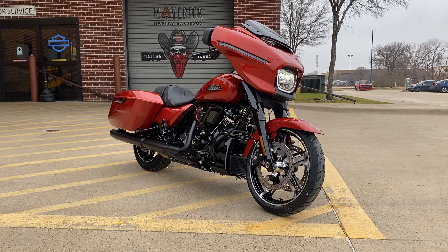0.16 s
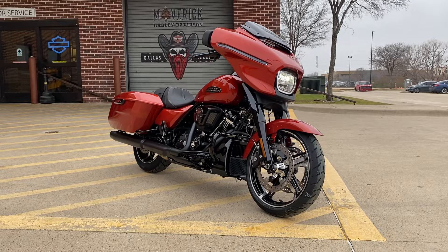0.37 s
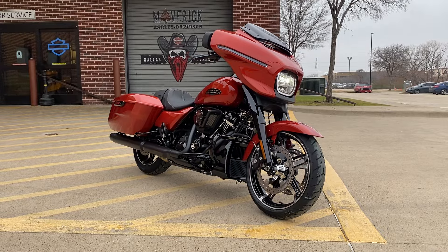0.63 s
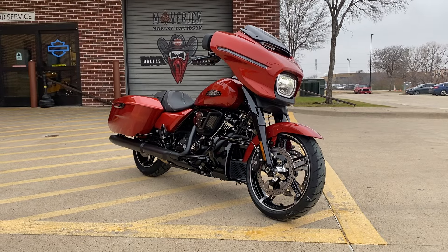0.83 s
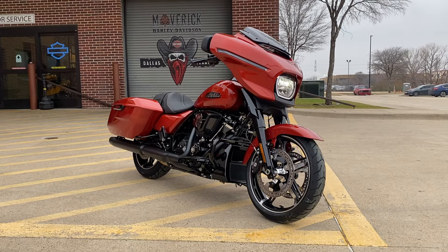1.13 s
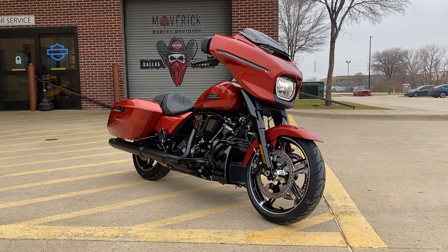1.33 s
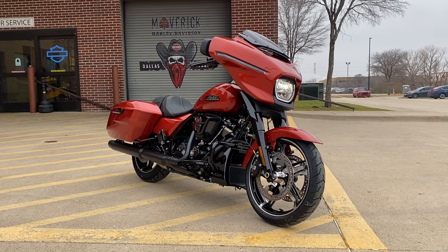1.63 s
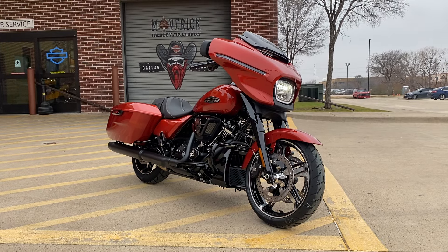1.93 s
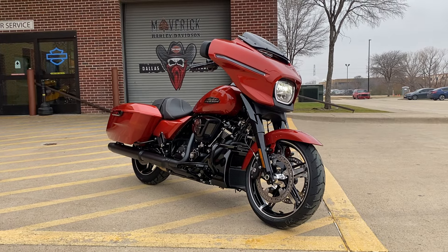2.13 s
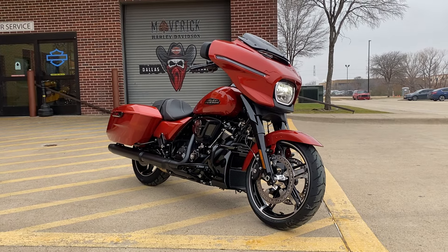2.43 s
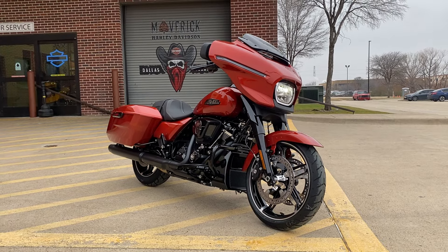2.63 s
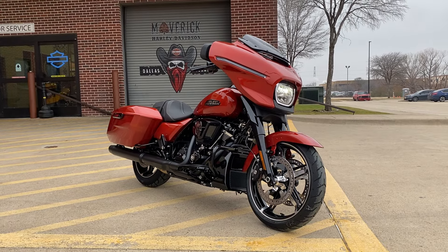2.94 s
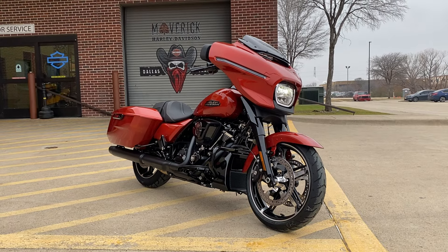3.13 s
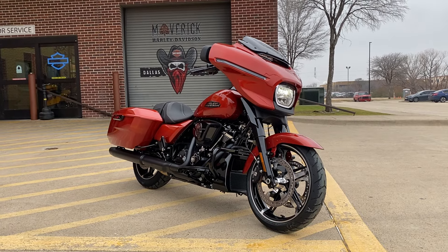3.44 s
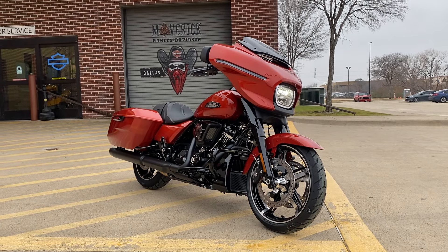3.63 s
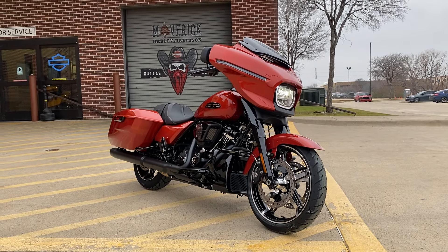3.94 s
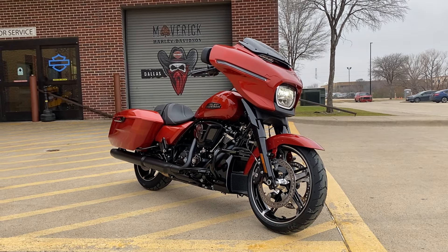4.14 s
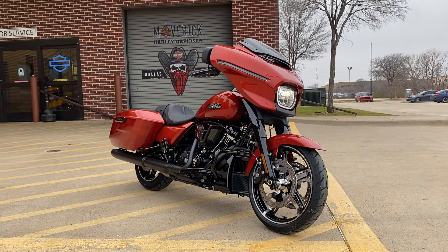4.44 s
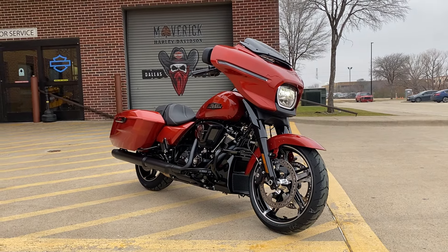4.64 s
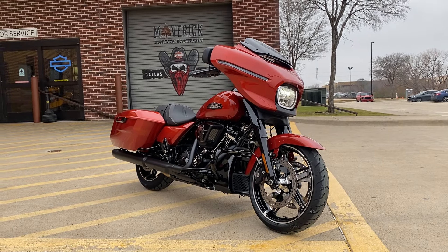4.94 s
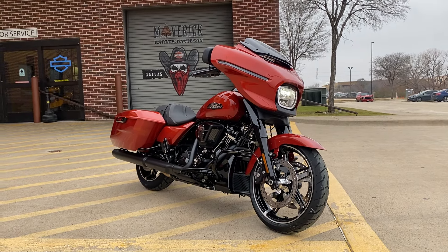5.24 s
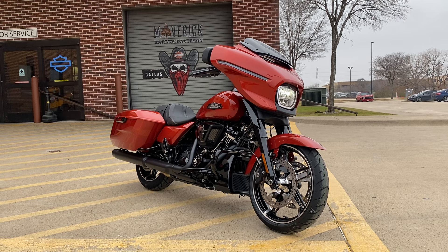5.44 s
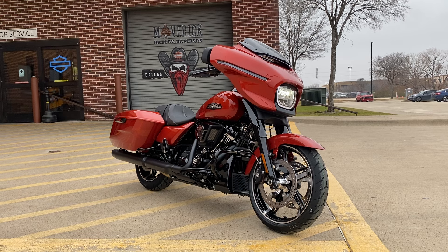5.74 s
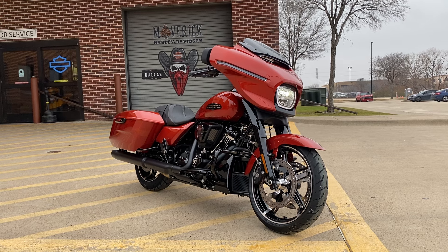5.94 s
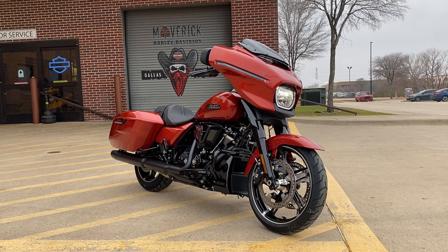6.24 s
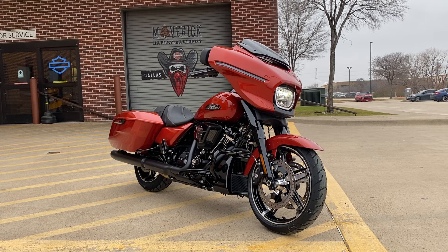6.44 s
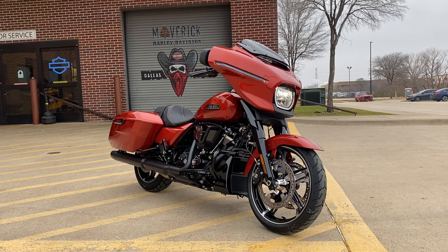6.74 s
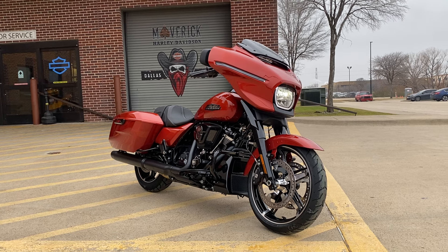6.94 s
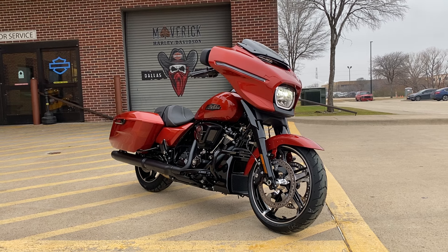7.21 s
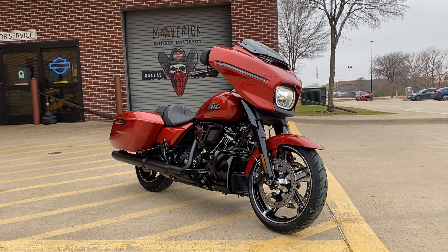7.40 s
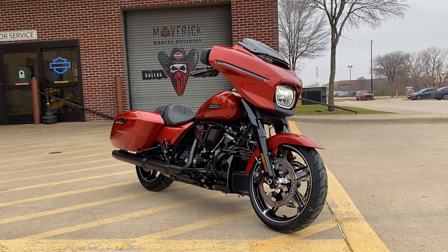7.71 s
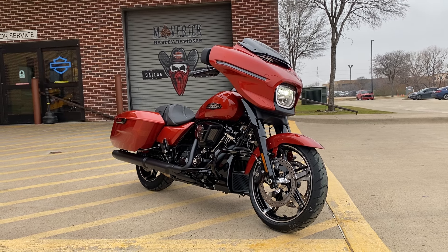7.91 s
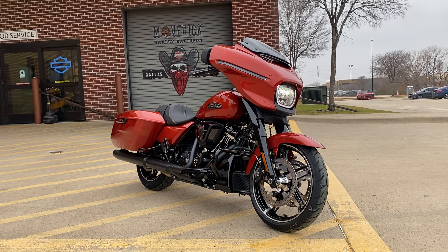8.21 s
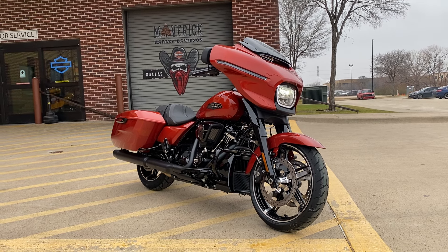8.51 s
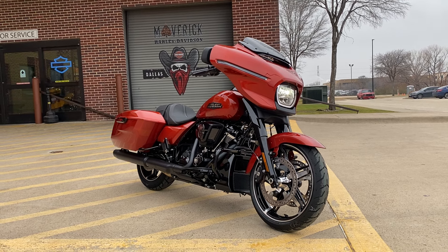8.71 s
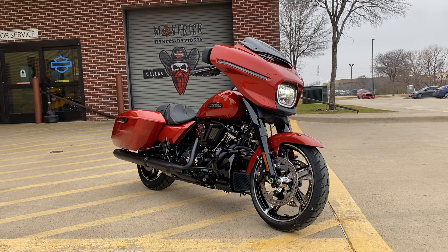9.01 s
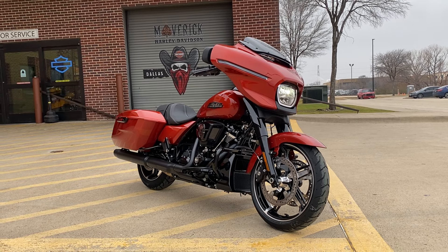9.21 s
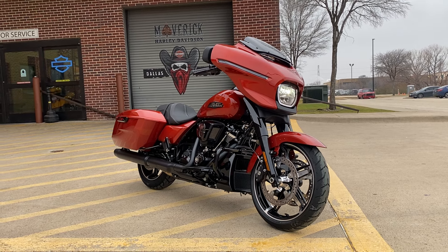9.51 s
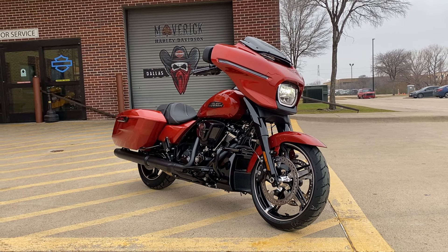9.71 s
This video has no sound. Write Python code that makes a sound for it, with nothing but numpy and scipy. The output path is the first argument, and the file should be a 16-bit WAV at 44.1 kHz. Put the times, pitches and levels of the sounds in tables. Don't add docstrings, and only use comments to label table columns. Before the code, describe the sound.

A heavy motorcycle idles close by in the open air, its low loping exhaust pulse wrapped in dry metallic ticking, dull clacks and hissy clatter. Gusts hit the unprotected handheld stereo microphone from the start, with deep flutter and blunt thuds peaking halfway. Afterwards the low end is pulled down, the engine sags briefly, and fuller bass returns.

```python
import sys
import numpy as np
from scipy import signal
from scipy.fft import rfft, irfft
from scipy.io import wavfile

SR = 44100
rng = np.random.default_rng(int(sys.argv[2]) if len(sys.argv) > 2 else 0)


def field_ratio(decibels):
    return 10 ** (np.asarray(decibels, dtype=float) / 20)


def transcribe(u):
    v = np.clip(np.atleast_2d(u).T, -1, 1)
    q = np.round(v * 32767).astype(np.int16)
    wavfile.write(sys.argv[1], SR, q)


N = 434804
TIME = np.arange(N) / SR
FREQ = np.arange(N // 2 + 1) * SR / N + 1
CYCLE_HZ = 8.45

# [t/s, lag/ms]
CRANK_LAG = [(0.06, -6.5), (0.4, -9), (1.0, -1.5), (1.5, -7), (1.95, -5.3), (2.43, -0.8), (2.7, -3.3),
             (3.2, -1.8), (3.63, 3.6), (4.15, -1), (4.9, 1.7), (5.8, 0.5), (6.3, 1), (7.0, -1), (7.95, 6.3),
             (8.7, 1.2), (9.3, 1.6), (9.8, -1)]
# [t/s, level/dB]
ENGINE = [
    (0.0, -2.5),
    (0.5, -2.8),
    (4.8, -3.5),
    (6.2, -5.5),
    (6.5, -3),
    (7.66, -9.5),
    (8.2, -4),
    (9.5, -3.5),
    (9.86, -8.5),
]
# [t/s, bass gain/dB]
BASS_DUCK = [
    (0, 1.5),
    (5.5, 0.5),
    (5.6, -10.5),
    (7.0, -9.5),
    (7.85, -9),
    (8.05, -1),
    (9.86, 2),
]


def rms_one(x):
    return x / np.sqrt(np.mean(x ** 2) + 1e-20)


def in_time(rows):
    t, *columns = np.transpose(rows)
    return [np.interp(TIME, t, column) for column in columns]


def at_hz(points):
    hz, value = np.transpose(points)
    return np.interp(np.log(FREQ), np.log(hz + 1), value)


def drift(rate_hz):
    r = np.exp(-80 * np.pi * rate_hz / SR)
    steps = rng.standard_normal(N // 40 + 2002)
    slow = signal.lfilter([1], [1, -2 * r, r * r], steps)[2000:]
    return np.interp(np.arange(N) / 40, np.arange(len(slow)), rms_one(slow))


def noise(gain):
    return rms_one(irfft(rfft(rng.standard_normal((3, N))) * gain, N))


def butter(x, hz, kind, order):
    return signal.sosfilt(signal.butter(order, hz, kind, fs=SR, output="sos"), x)


def clicks(times, db):
    out = np.zeros(N) + 1e-18
    samples = (np.asarray(times) * SR).astype(int)
    np.add.at(out, np.clip(samples, 0, N - 1), field_ratio(db))
    return out


def every_cycle(pattern, spread_db, jitter_s):
    share, db = np.transpose(pattern)
    steady = (np.arange(84)[:, None] + share) / CYCLE_HZ
    times = steady + np.interp(steady, *np.transpose(CRANK_LAG)) / 1000
    times = times + jitter_s * rng.standard_normal(times.shape)
    db = db + spread_db * rng.standard_normal(times.shape)
    inside = (times > 0) & (times < N / SR)
    return clicks(times[inside], db[inside])


def ring(blows, modes):
    out = 0
    for hz, db, t60 in modes:
        r = field_ratio(-60 / (t60 * SR))
        w = 2 * np.pi * hz / SR
        out = out + signal.lfilter([0, field_ratio(db) * np.sin(w)], [1, -2 * r * np.cos(w), r * r], blows)
    return out


def die_away(blows, tau_s):
    return signal.lfilter([1], [1, -np.exp(-1 / (tau_s * SR))], blows)


def rough(blows, length_s):
    puffs = signal.fftconvolve(blows, np.hanning(round(length_s * SR)))[:N]
    return puffs * rng.standard_normal((3, N)) / np.sqrt(length_s * SR / 2)


def smear(x, hz, width_hz):
    r = np.exp(-np.pi * width_hz / SR)
    a = [1, -2 * r * np.cos(2 * np.pi * hz / SR), r * r]
    return signal.lfilter(a[::-1], a, x)


def spread(x, lag_s):
    lag = round(lag_s * SR)
    return np.array([x, np.roll(x, -lag), np.roll(x, lag)])


def exhaust():
    # [share of cycle, level/dB]
    firings = [
        (.020, 0),
        (.441, 0),
    ]
    # [share of cycle, level/dB]
    kick = [
        (.78, -8),
    ]
    # [f/Hz, level/dB, t60/s]
    pipe = [(58.4, -25, .6), (73.6, -24, .6), (91.6, -21, .23)]
    # [f/Hz, level/dB, t60/s]
    muffler = [(124.5, -32, .5)]
    # [share of cycle, level/dB]
    piston_knocks = [(.17, -29.5), (.41, -34.5), (.655, -36), (.9, -38)]
    # [f/Hz, level/dB, t60/s]
    crankcase = [(188.5, 5.5, 0.064), (233, -12.5, 0.11)]
    suction = every_cycle(kick, spread_db=2.0, jitter_s=.0005)
    slugs = suction - every_cycle(firings, spread_db=1.5, jitter_s=.0004)
    pipe_thump = butter(ring(slugs, pipe) - ring(slugs, muffler), 260, "low", order=2)
    knocks = ring(every_cycle(piston_knocks, spread_db=2.0, jitter_s=0.0022), crankcase)
    knocks = butter(knocks, 380, "low", order=2)
    return (pipe_thump + knocks) * field_ratio(in_time(BASS_DUCK)[0])


def intake():
    # [share of cycle, level/dB]
    gulp_pattern = [
        (.16, -21),
        (.52, -33),
        (.63, -32),
        (.76, -34),
        (.85, -34),
    ]
    # [f/Hz, level/dB, t60/s]
    air_box = [(498, 4.5, .05), (560, -8, .03)]
    gulps = every_cycle(gulp_pattern, spread_db=0.9, jitter_s=.001)
    bore = ring(gulps, [(496, -33, .03)])
    honk = ring(bore, air_box)
    return spread(honk * field_ratio(in_time(ENGINE)[0] - 1), 0.00093)


def valves():
    # [share of cycle, level/dB]
    contacts = [(.975, -44), (.10, -58), (.235, -43.5), (.38, -72), (.52, -43), (.65, -58), (.71, -116),
                (.88, -48.5)]
    # [t/s, peak level/dB]
    hard_ticks = [(0.0223, -35), (0.3735, -45), (0.4923, -51), (0.6155, -39), (0.7342, -45), (0.855, -39),
                  (1.0944, -43), (1.1283, -34), (1.2067, -36), (1.2391, -33), (1.3578, -43), (1.5604, -41),
                  (1.7983, -37), (1.917, -43), (2.0368, -42), (2.2772, -34), (2.5461, -35), (2.7796, -48),
                  (2.9861, -42), (3.019, -43), (3.1028, -48), (3.1358, -44), (3.3423, -36), (3.4645, -35),
                  (3.5823, -44), (3.7015, -46), (3.7349, -37), (3.9679, -43), (4.4074, -43), (4.5585, -35),
                  (4.6443, -38), (5.0888, -47), (5.1193, -40), (5.3552, -47), (5.6231, -38), (5.8301, -43),
                  (5.8621, -41), (5.9798, -40), (6.1838, -36), (6.3026, -44), (6.57, -37), (6.775, -40),
                  (7.011, -38), (7.1621, -44), (7.2494, -39), (7.4889, -35), (7.6071, -41), (7.7298, -39),
                  (7.8451, -41), (7.9633, -42), (8.2003, -47), (8.4662, -38), (8.6253, -43), (8.6697, -36),
                  (8.757, -44), (8.8189, -39), (9.0224, -41), (9.1426, -41), (9.4135, -35), (9.7308, -46)]
    # [f/Hz, level/dB per Hz]
    tick_colour = [(1200, -15), (2200, 8.5), (3500, 4), (6000, -2), (8000, 6), (11000, 4), (13000, 6.5),
                   (15700, -25)]
    # [f/Hz, level/dB per Hz]
    hiss_colour = [(2500, -4), (4000, 9.5), (6000, 8), (7500, 2), (10000, -12), (15700, 2)]
    t, db = np.transpose(hard_ticks)
    hard = clicks(t - .001, db - 10.5)
    blows = every_cycle(contacts, spread_db=1.8, jitter_s=0.0017) + hard
    swell = butter(blows, 137, "low", order=2)
    tick = die_away(swell, 0.0056)
    crack = die_away(butter(hard, 500, "low", order=2), 0.0025)
    trail = die_away(np.minimum(swell, field_ratio(-82.0)), 0.018)
    ticks = (tick + field_ratio(3.0) * crack) * noise(field_ratio(at_hz(tick_colour)) * (FREQ > 1000))
    return ticks + field_ratio(-8.5) * trail * noise(field_ratio(at_hz(hiss_colour)) * (FREQ > 2000))


def rockers():
    # [share of cycle, level/dB]
    clack_pattern = [(.07, -39.5), (.345, -34.5), (.54, -38), (.68, -35.5), (.83, -37.5), (.935, -35)]
    # [f/Hz, level/dB, t60/s]
    covers = [(591.3, 3.5, 0.061), (765, -1, 0.032), (815, -6.5, 0.077), (1178, -5, 0.16),
              (1750, -8, 0.0073), (2425, -17, 0.087)]
    # [share of cycle, level/dB]
    tappets = [(.27, -43), (.45, -48), (.6, -48), (.74, -46), (.97, -48)]
    # [f/Hz, level/dB, t60/s]
    fins = [(1840, 1, .025), (2030, -7, .02), (2430, -4, .03)]
    clacks = every_cycle(clack_pattern, spread_db=2.5, jitter_s=0.0037)
    taps = every_cycle(tappets, spread_db=4.5, jitter_s=0.0029)
    return ring(rough(clacks, .011), covers) + ring(rough(taps, .003), fins)


def clatter():
    # [f/Hz, level/dB per Hz]
    clatter_colour = [(340, -4), (490, 7), (620, 2), (1000, -2), (1450, -3.5), (2000, -8.5), (2800, -15.5),
                      (4300, -18.5), (5500, -28), (7000, -28), (8200, -24.5), (11000, -32.5),
                      (13000, -29.5), (15700, -36)]
    # [f/Hz, width/Hz, level/dB]
    case = [(495, 110, -8), (740, 30, 4), (1165, 40, 4), (1860, 160, 5), (2430, 80, 5), (3800, 64, 4),
            (4200, 40, 5), (4700, 90, 2), (5660, 90, 4), (6250, 60, 5)]
    # [multiple of the cycle, swing/dB, share of cycle at the top]
    cycle_beat = [(1, 0.37, 0.27), (3, 0.45, .3)]
    colour_db = at_hz(clatter_colour)
    for hz, width, top_db in case:
        colour_db = colour_db + top_db / (1 + (2 * (FREQ - hz) / width) ** 2)
    blur = butter(noise(field_ratio(colour_db)), 49, "high", order=2)
    dull = butter(blur, 1500, "low", order=2)
    bright = blur - dull
    patchy = dull * field_ratio(1.6 * drift(3.2)) + bright * field_ratio(0.5 * drift(17))
    effort_db = 0.19 * in_time(ENGINE)[0]
    cycles = (TIME - in_time(CRANK_LAG)[0] / 1000) * CYCLE_HZ
    beat_db = sum(db * np.cos(2 * np.pi * round(k) * (cycles - top)) for k, db, top in cycle_beat)
    return field_ratio(-31.5 + effort_db - effort_db.mean() + beat_db) * patchy


def gusts(gust_db, duck_db, flutter_db):
    white = rng.standard_normal((2, 3, N))
    rumble = rms_one(butter(butter(white[0], 120, "low", order=4), 49.4, "high", order=4))
    flutter = rms_one(butter(butter(white[1], 230, "low", order=4), 112, "high", order=2))
    lumps = drift(29.5)
    deep = field_ratio(gust_db + duck_db - 5.0 + 3.2 * lumps) * rumble
    return deep + field_ratio(flutter_db - 32 + 3.03 * lumps + 0.48 * drift(6.7)) * flutter


def buffets(swing_db, flutter_db):
    # [t/s, peak level/dB]
    strong = [(0.679, -12), (0.892, -7), (1.167, -6), (1.455, -11), (1.494, -8.5), (1.548, -10),
              (1.732, -0.5), (2.003, -12), (2.675, -4.5), (3.063, -6), (3.31, -8), (4, -2.5), (4.13, -4.5),
              (4.266, 2.5), (4.532, -7.5), (4.65, -4), (4.942, -6), (5.048, 4.5), (5.4, 3.5), (5.456, 0),
              (5.5, -5.5), (5.728, -5), (5.908, -12), (6.04, -9), (6.526, -13), (6.652, -10), (6.82, -9.5),
              (6.86, -13), (6.955, -14), (7.077, -14.5)]
    # [t/s, peak level/dB]
    light = [(0.178, -22), (0.256, -25), (0.388, -16), (0.439, -17), (0.48, -21), (0.509, -23),
             (0.725, -17), (0.954, -21), (1.634, -13.5), (2.332, -19), (2.486, -20), (2.566, -20),
             (2.801, -17), (2.919, -24), (3.248, -26), (3.394, -26), (3.487, -17), (3.61, -17),
             (3.641, -20), (3.681, -18), (3.909, -21), (4.184, -17), (4.401, -17), (5.111, -12),
             (5.259, -18), (5.346, -24), (5.875, -21), (6.3, -19.5), (6.365, -26), (6.553, -19),
             (6.771, -20), (8.117, -27), (8.307, -28), (8.394, -24), (8.495, -18), (8.863, -19),
             (9.145, -30), (9.329, -25), (9.53, -22), (9.561, -21), (9.673, -20), (9.793, -24)]
    born = rng.random(N) < 7.0 * field_ratio(swing_db) / SR
    small = born * field_ratio(-33.5 + 1.5 * rng.standard_normal(N) + flutter_db)
    t, db = np.transpose(strong)
    shed_s = rng.uniform(.6, 1.6, (len(t), 2)) * [-.013, .013]
    companions = clicks(t[:, None] + shed_s, db[:, None] - 12 + 0 * shed_s)
    blows = field_ratio(30.0) * (clicks(t, db) + companions + small)
    blows = blows + field_ratio(35.5) * clicks(*np.transpose(light))
    body = butter(blows, 324, "low", order=4)
    edge = field_ratio(-19.5) * butter(blows, 640, "low", order=2)
    sharp = butter(body + edge, 57, "high", order=2)
    return smear(smear(sharp, 125, 157), 220, 286)


def thumps():
    # [t/s, peak level/dB, f/Hz]
    heavy = [(0.39, -7.5, 91), (0.504, -8.5, 113), (0.686, -2.5, 78.5), (1.167, -6, 77), (1.639, -9, 73.5),
             (1.73, -14, 70), (2.003, -1, 73.4), (2.484, -6, 62.6), (2.676, -4.5, 94.5), (2.829, -12, 68),
             (3.056, -12, 85), (3.304, -5.5, 74), (3.431, -1.5, 88.6), (4.263, -9, 98), (4.32, -9.5, 122),
             (4.372, -13, 70.4), (4.704, -4, 79), (4.845, -9, 69), (5.04, -3, 76), (5.202, -6.5, 72),
             (5.308, -13, 77), (5.39, -17, 121), (5.904, -15, 89.5), (6.362, -14, 76), (6.61, -13.5, 79),
             (6.904, -15.5, 65.4), (7.747, -24, 64), (8.046, -14, 73.4), (8.214, -8, 70.0),
             (8.395, -12, 75)]
    # [t/s, peak level/dB, f/Hz]
    light = [(0.189, -14, 64.6), (0.249, -13, 70.0), (0.626, -17, 61.9), (0.872, -3, 55),
             (1.059, -22, 61.9), (1.269, -15, 129), (1.408, -14, 67.3), (1.469, -6, 64.6),
             (2.357, -16, 59.2), (3.017, -4, 56.5), (3.55, -12, 64), (3.639, -7, 80.7), (3.898, -12, 75.4),
             (4.068, -8, 100), (4.139, -15, 80.7), (5.129, -3, 91), (5.229, -4.5, 67.3), (5.723, -24, 64.6),
             (6.02, -11, 75.4), (6.3, -13.5, 94.2), (6.732, -14, 75.4), (6.789, -15, 108),
             (6.859, -27, 86.1), (6.959, -16, 78.1), (7.075, -16, 102), (7.264, -19, 96.9),
             (7.34, -27, 70.0), (7.924, -19, 70.0), (8.097, -12, 106), (8.128, -7, 75.4), (8.17, -17, 69.5),
             (8.449, -16, 99.6), (8.498, -9, 95), (8.691, -13, 59), (8.987, -17, 68), (9.039, -11, 67.3),
             (9.101, -11, 78.1), (9.169, -28, 61.9), (9.25, -12, 61.9), (9.29, -17, 59.2),
             (9.349, -13, 64.6), (9.4, -8, 72), (9.459, -24, 75.4), (9.565, -15, 80.7), (9.639, -24, 61.9),
             (9.693, -12, 67.3), (9.759, -7, 56.5)]
    out = np.zeros(N + SR)
    t = np.arange(SR // 10) / SR
    swell = (t / 0.012) ** 2 * np.exp(2 - 2 * t / 0.011)
    for start, db, hz in [*heavy, *((s, db - 2.5, hz) for s, db, hz in light)]:
        out[int(start * SR):][:len(t)] -= field_ratio(db - 4.5) * swell * np.sin(2 * np.pi * hz * t)
    return out[:N]


def wind():
    # [t/s, rumble level/dB]
    gust_curve = [(0.0, -22), (0.8, -20), (1.35, -19), (2.15, -20.5), (3.3, -20.5), (3.5, -15.5),
                  (3.8, -21.5), (4.14, -13.5), (4.36, -22), (4.85, -21), (5.22, -16), (5.7, -17.5),
                  (6.04, -15), (6.32, -25.5), (6.7, -14.5), (7.8, -26), (8.3, -21), (9.86, -22.5)]
    gust_db, duck_db = in_time(gust_curve)[0], in_time(BASS_DUCK)[0]
    swing_db = gust_db - gust_db.mean()
    flutter_db = swing_db + 0.71 * duck_db
    sharp = spread(buffets(swing_db, flutter_db), 0.0007)
    return gusts(gust_db, duck_db, flutter_db) + sharp + spread(thumps(), 0.00087)


def ports(field, direct):
    # [f/Hz, left lead/rad]
    port_phase = [(0, 0.31), (430, 0.48), (1550, 2.91), (2240, 0), (4050, 2.3), (5000, 1.9), (5770, -1.7),
                  (6460, -1.2), (16600, -12.92)]
    # [f/Hz, share of power 0-1]
    shared_power = [(60, 0.72), (300, 0.9), (700, 0.84), (1400, 0.43), (2400, 0.69), (3300, 0.089),
                    (4000, 0.63), (5000, 0.12), (6500, 0.69), (7800, 0.65), (9700, 1), (11000, 1),
                    (12300, 1), (13500, 0.8), (15000, 0.54)]
    # [f/Hz, level/dB]
    left_excess = [(60, -.8), (200, 0), (1300, 0), (2400, -1.5), (4400, -.3), (7000, 0), (15000, 0)]
    shared = np.clip(at_hz(shared_power), 0, 1)
    own = np.sqrt(1 - shared)
    both, left, right = rfft(field)
    both = np.sqrt(shared) * both + rfft(direct)
    hz, lead = np.transpose(port_phase)
    turn = np.exp(.5j * np.interp(FREQ, hz, lead))
    tilt = field_ratio(at_hz(left_excess) / 2)
    return irfft([(both * turn + own * left) * tilt, (both / turn + own * right) / tilt], N)


def scene():
    field = intake() + rockers() + valves() + clatter() + wind()
    return ports(field, exhaust())


def low_pass(x):
    return signal.sosfilt(signal.butter(12, 15790, fs=SR, output="sos"), x)


def record(dry):
    x = butter(dry, 38, "high", order=2)
    x = 1.2 * np.tanh(x / 1.2)
    return low_pass(x)


dry = scene()
out = record(dry)
transcribe(out)
```